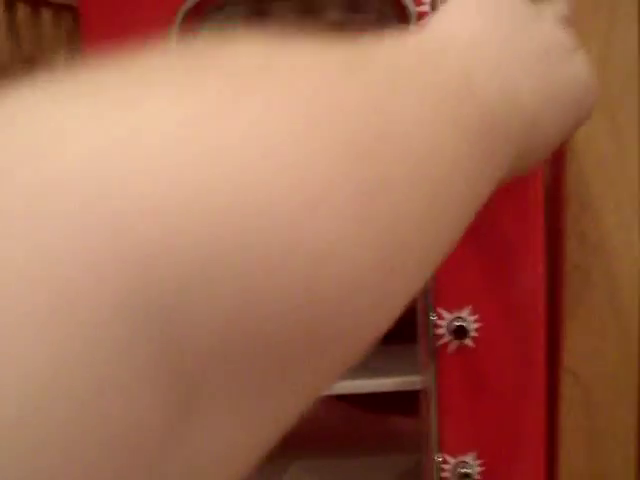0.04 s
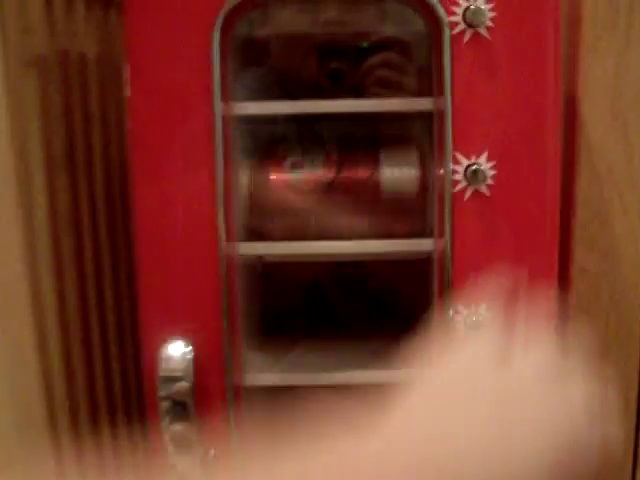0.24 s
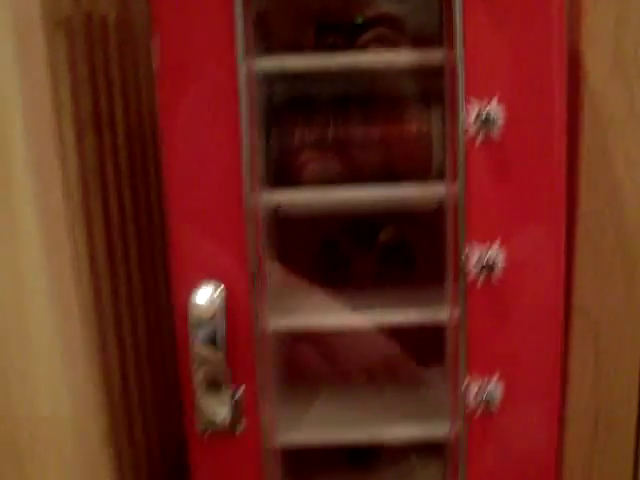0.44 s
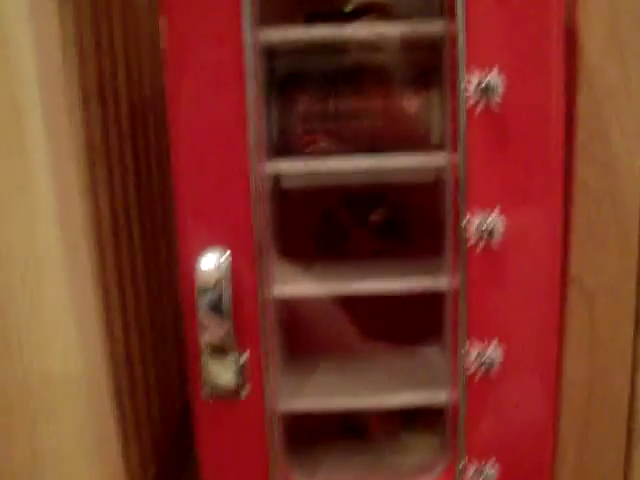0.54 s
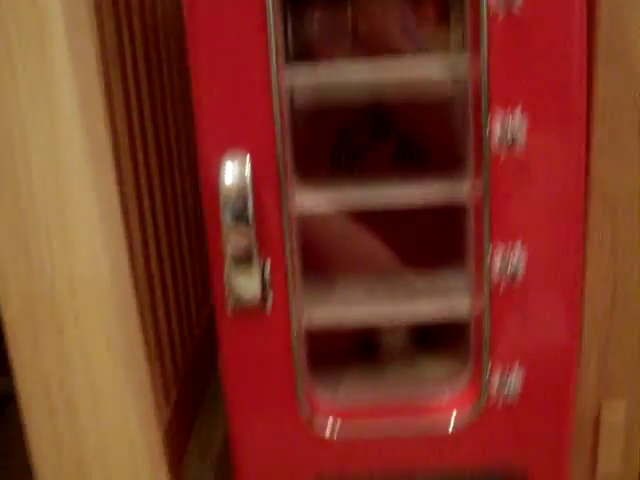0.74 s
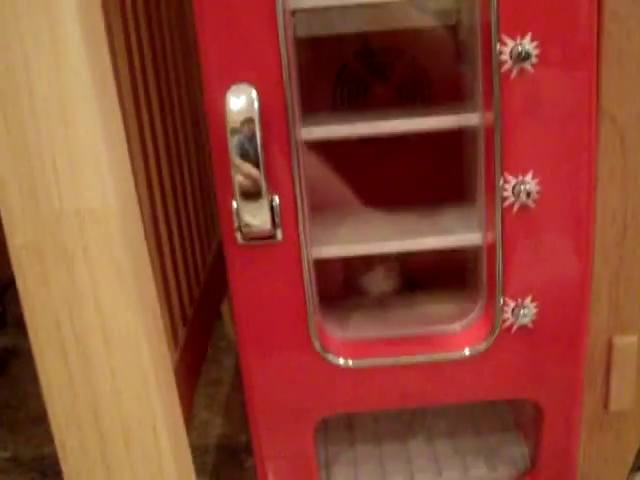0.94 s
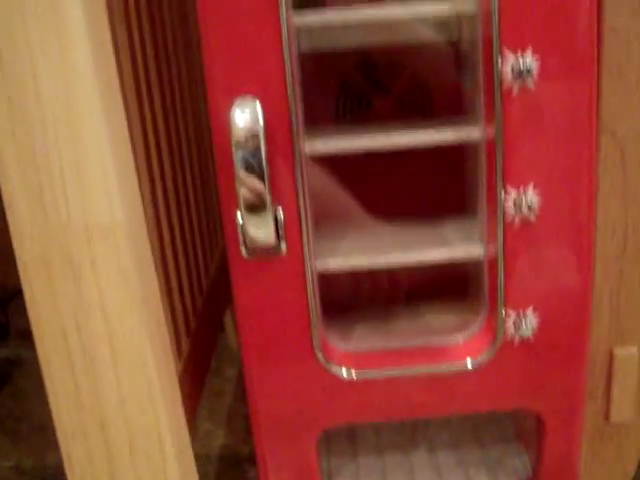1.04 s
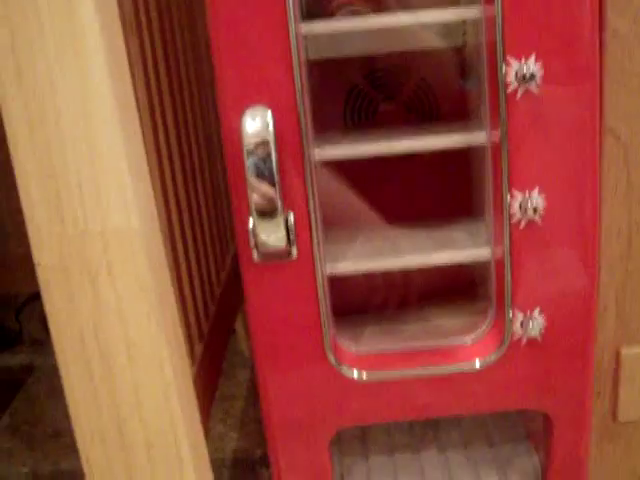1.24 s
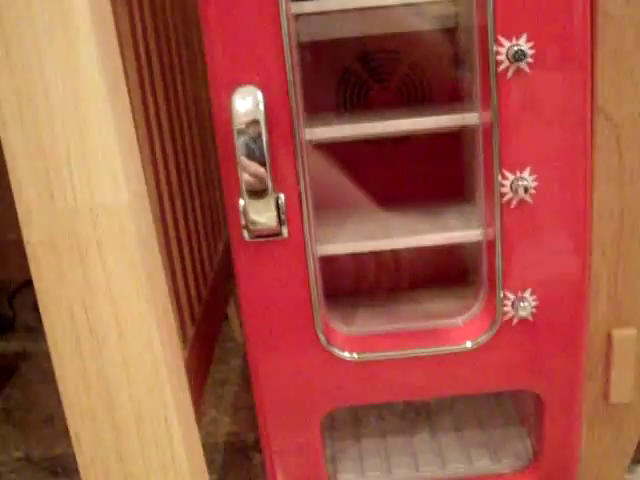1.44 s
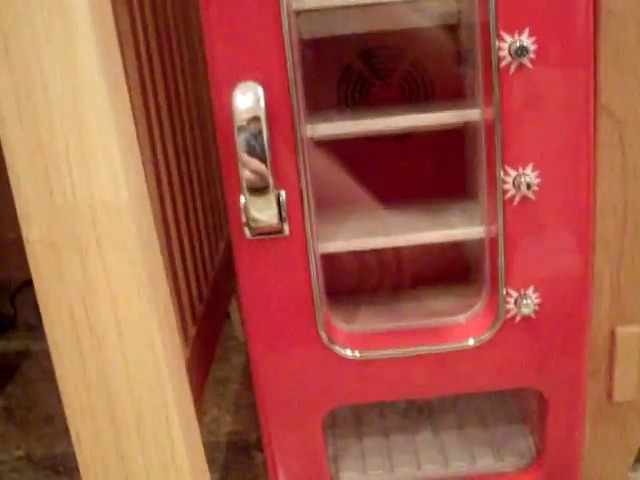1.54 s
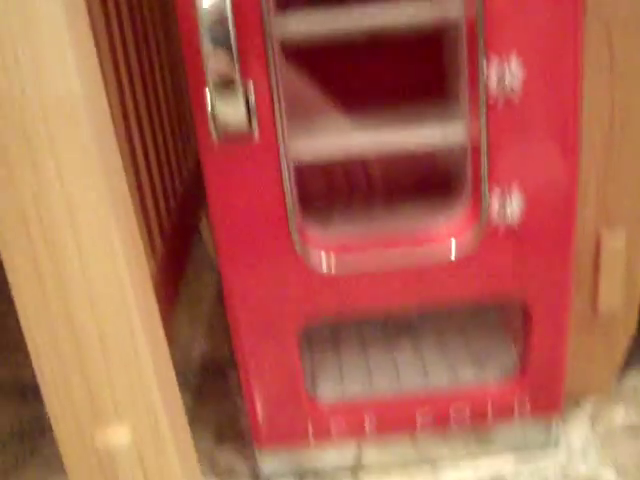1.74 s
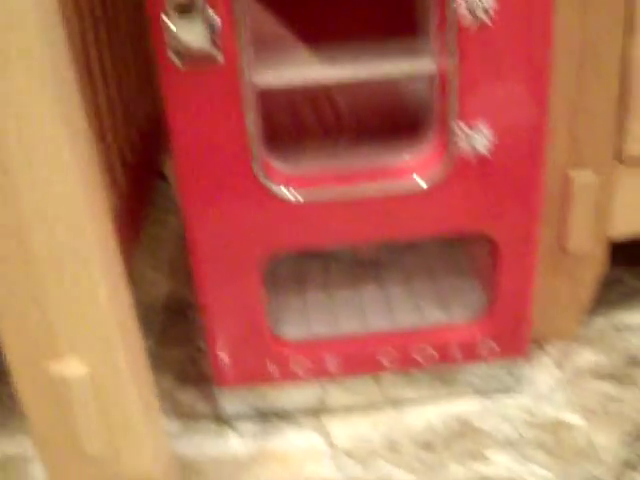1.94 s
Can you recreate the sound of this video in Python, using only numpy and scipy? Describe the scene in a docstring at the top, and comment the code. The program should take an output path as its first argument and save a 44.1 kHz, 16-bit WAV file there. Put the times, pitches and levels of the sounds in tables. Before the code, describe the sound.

Close and slightly overloaded, a release latch clicks and a full can bangs down a chute in a rapid cluster, pauses, then thunks again into the tray; boxy cabinet ring, quiet cooling fan, small room indoors.

```python
"""A can released inside a small vending fridge tumbles down the chute and thunks twice into the plastic tray.
Each blow excites decaying cabinet modes, a hollow panel note, a noisy knock and a clatter with metallic modes.
A latch clicks as snaps of noise over ringing metal; shaped noise makes a low rumble as the can rolls. The
cooling fan hums in wavering sines over rushing air. The microphone is close, in a small room; its input clips
on the big blows, and a notched voice band saturates softly after it."""
import sys
import numpy as np
from scipy import signal
from scipy.fft import rfft, irfft
from scipy.io import wavfile

SR = 44100
rng = np.random.default_rng(int(sys.argv[2]) if len(sys.argv) > 2 else 0)


def to_wav(s):
    """Save 16-bit WAV."""
    ch = np.atleast_2d(s).T  # columns
    pcm = np.round(np.clip(ch, -1, 1) * 32767)  # PCM
    wavfile.write(sys.argv[1], SR, pcm.astype(np.int16))


N = 85995
T = np.arange(27000) / SR  # time within one blow or click, s

# Blows of the can on chute and tray. Each row: start in seconds, cabinet boom in dB, panel knock in dB,
# bright clatter in dB, note of the struck panel in Hz, level of that note in dB.
BLOWS = [(0.125, -40, -28, -58.5, 138.4, -20), (0.275, -11.5, -13, -18.5, 184.4, 0),
         (0.3594, -3.5, 0, -11.5, 132, 7), (.366, -11.5, -1.5, -6.5, 288.8, 6.5),
         (.383, -6.5, -5.5, -7, 232, -3.5), (.427, -7, 2.5, 5, 215, 1), (.434, 2, -0.5, 2.5, 147.6, 8.5),
         (.446, -3, -2.5, -3, 120.3, 3), (.455, -7.5, -4, -0.5, 117, 3),
         (.472, -10.5, -5.5, -4.5, 116.7, 0.5), (0.505, -20, -11, -13, 284, -10.5),
         (.548, -7.5, -4.5, -7.5, 413.5, 0.5), (.556, -16.5, -10, -10, 277.5, -0.5),
         (.598, -26, -27, -17, 157, -20), (.625, -16.5, -11, -13, 422.5, -14),
         (.630, -22, -13.5, -13.5, 159, -9.5), (.672, -20.5, -17, -23.5, 177.6, -6.5),
         (0.727, -46.5, -35, -37, 161.6, -15.5), (0.826, -37.5, -41, -36.5, 189.5, -45),
         (1.036, -29, -30.5, -41, 173, -21), (1.091, -19, -17.5, -26, 174, -26.5),
         (1.134, -15, -18, -38, 173, -15), (1.160, -7, 2, 3, 454.5, 3.5),
         (1.170, -5.5, -3.5, -5.5, 154.9, 8.5), (1.209, -15, -20, -27, 608, -10.5),
         (1.222, -14, -13, -12.5, 227.2, -4.5), (1.243, -18.5, -24, -29, 173, -6.5),
         (1.256, -24, -23, -37.5, 232, -7), (1.328, -30, -23, -33, 227, -29),
         (1.365, -28.5, -30, -37, 114, -18)]
# Modes of the hollow cabinet. Each row: frequency in Hz, relative level in dB, t60 in seconds.
CABINET_MODES = [(75.4, -12, 0.53), (114.27, -8, 0.41), (162.55, -10, 0.52), (176.5, -5, 0.36),
                 (232.4, -9, 0.28), (279.3, -9, .28), (313.5, -15.5, 0.44), (387, -23.5, 0.21),
                 (463, -17.5, 0.5), (515.4, -23.5, 0.21), (739.5, -21, 0.21), (843, -17.5, .3)]
# Modes of the full can and the chute. Each row: frequency in Hz, relative level in dB, t60 in seconds.
CAN_MODES = [(992, -20.5, 0.18), (1191, -15, .28), (1326, -16, 0.2), (1930, -19.5, 0.18),
             (2195, -23.5, 0.15), (2395, -20, 0.19), (2830, -23, 0.15), (4210, -27, 0.13)]
# Spectrum of the panel knock. Each row: frequency in Hz, relative level in dB.
KNOCK_COLOUR = [(25, -25), (60, -20), (130, 2), (280, 2.5), (500, -0.5), (800, -6.5), (1400, -13.5),
                (3000, -26.5), (6000, -49)]
# Spectrum of the bright clatter. Each row: frequency in Hz, relative level in dB.
CLATTER_COLOUR = [(100, -27.5), (500, 13.5), (1000, 4.5), (2000, 7), (2800, 2.5), (4200, 0.5), (5500, -0.5)]
# Ring of the cabinet and room. Each row: frequency in Hz, t60 in seconds.
ROOM_DECAY = [(60, 0.39), (250, 0.36), (800, 0.47), (2000, 0.4), (5000, 0.33)]
# Clicks of the release latch. Each row: start in seconds, level in dB.
LATCH_CLICKS = [(.002, -28.5), (.166, -28), (.176, -26.5), (.183, -18.5), (.194, -4), (.200, -8),
                (0.22, -22.5), (0.235, -29.5)]
# Modes of the metal latch. Each row: frequency in Hz, relative level in dB, t60 in seconds.
LATCH_MODES = [(744, -8.5, .3), (1280, -14, 0.18), (1480, -30, 0.46), (1700, -30, 0.053),
               (2240, -12.5, 0.4), (3960, -30.5, 0.21), (5220, -29, 0.13)]
# Spectrum of the latch noise. Each row: frequency in Hz, relative level in dB.
CLICK_COLOUR = [(30, -29), (120, 5), (400, 8), (800, 9), (1500, 9.5), (2700, 4), (4300, 3), (5500, -6)]
# Low rumble as the can rolls. Each row: time in seconds, level in dB.
ROLL_LEVEL = [(0, -39.5), (.17, -38), (.23, -22), (.3, -50.5), (.5, -9), (.7, -32), (.8, -34.5),
              (1.0, -42.5), (1.15, -39), (1.4, -40.5), (1.55, -49), (1.95, -58)]
# Spectrum of that rumble. Each row: frequency in Hz, relative level in dB.
ROLL_COLOUR = [(20, -8), (45, -7), (66, -3.5), (76, 4), (95, -14), (120, -2.5), (180, -6.5), (300, -18),
               (900, -22), (5000, -43)]
# Tones of the fan. Each row: frequency in Hz, rms level in dB before flutter.
FAN_TONES = [(177.6, -55.5), (295, -44.5), (587, -58), (1007, -66), (1260, -60.5), (1351, -59.5),
             (1793, -60.5)]
# Spectrum of the fan's air. Each row: frequency in Hz, relative level in dB.
AIR_COLOUR = [(20, -4.5), (43, 6), (65, -8.5), (120, -9.5), (180, -6.5), (300, 0.5), (420, -5), (800, -7.5),
              (1400, -10), (2100, -9), (2800, -18), (4300, -19), (5500, -21.5)]

BOOM_RISE_S, BOOM_SCATTER_DB = 0.0053, 0.5
NOTE_RISE_S, NOTE_T60_S = 0.0044, 0.099
GRAIN_DB, GRAIN_HZ = 2.5, 260  # rms depth and rate of the chatter in a burst
SNAP_DB, SNAP_T60_S = -2.5, 0.0082
PITCH_WANDER, LEVEL_FLUTTER = 0.0074, 0.15  # rms fractions, fan tones
AIR_DB = -42
OVERLOAD, KNEE = 1.15, 0.83  # amplitudes: input clips; later saturation begins
NOTCH_HZ, NOTCH_WIDTH_HZ, NOTCH_DB = 3395, 236, -46
VOICE_EDGE_HZ, EDGE_HZ = 5350, 16500


def amp(db):
    """Level to amplitude: 20 dB is a factor of ten."""
    return 10 ** (np.asarray(db) / 20)


def unit(x):
    """Normalisation to an rms of one."""
    return x / np.sqrt(np.mean(x ** 2) + 1e-20)


def read(points, hz):
    """Interpolation of a table along a logarithmic frequency axis."""
    f, value = np.transpose(points)
    return np.interp(np.log(hz + 1), np.log(f), value)


def add(mix, s, sound):
    """Superposition: a sound is summed into the mix from a time in seconds."""
    part = mix[max(round(s * SR), 0):][:len(sound)]
    part += sound[:len(part)]


def filtered_noise(gain, size):
    """Spectral shaping: white noise weighted by a gain on each frequency."""
    return unit(irfft(rfft(rng.standard_normal(size)) * gain, size))


def noise(colour, size):
    """Coloured noise: its spectrum follows a table of levels."""
    return filtered_noise(amp(read(colour, np.fft.rfftfreq(size, 1 / SR))), size)


def drift(rate_hz, size=N):
    """Slow random modulation: noise under a Gaussian low-pass."""
    return filtered_noise(np.exp(-(np.fft.rfftfreq(size, 1 / SR) / rate_hz) ** 2), size)


def ring(modes, scatter_db):
    """Modal decay: a strike shares its force among the modes a little differently each time."""
    out = np.zeros(len(T))
    for hz, db, t60 in modes:
        level = db + scatter_db * rng.standard_normal()
        out += amp(level - 60 * T / t60) * np.sin(2 * np.pi * hz * T)
    return out


def burst(colour, t60, room_db):
    """High modal density: crowded panel modes chatter and die fast, then ring on in cabinet and room."""
    hz, t, bands = signal.stft(noise(colour, len(T)), SR, nperseg=512)
    decay = amp(-60 * t / read(ROOM_DECAY, hz)[:, None])  # each frequency has its own t60
    tail = signal.istft(bands * decay, SR, nperseg=512)[1][:len(T)]
    chatter = unit(amp(GRAIN_DB * drift(GRAIN_HZ, size=len(T))))
    direct = noise(colour, len(T)) * chatter * amp(-60 * T / t60)
    # onsets: 1.2 ms direct, 13 ms for the ring
    return direct * np.minimum(T / 0.0012, 1) + amp(room_db) * tail * np.minimum(T / 0.013, 1)


def can():
    """Impact excitation: every blow sets off cabinet boom, hollow panel note, knock and metallic clatter."""
    out = np.zeros(N)
    for s, boom_db, knock_db, clatter_db, note_hz, note_db in BLOWS:
        boom = ring(CABINET_MODES, BOOM_SCATTER_DB) * (1 - np.exp(-T / BOOM_RISE_S))
        note_envelope = (1 - np.exp(-T / NOTE_RISE_S)) * amp(-60 * T / NOTE_T60_S)
        note = np.sin(2 * np.pi * note_hz * T) * note_envelope
        knock = burst(KNOCK_COLOUR, t60=0.092, room_db=-12)
        clatter = burst(CLATTER_COLOUR, t60=0.044, room_db=-15.5)
        clatter += amp(-5.5) * ring(CAN_MODES, scatter_db=2.5)
        add(out, s, amp(boom_db) * boom + amp(note_db) * note)
        add(out, s, amp(knock_db) * knock + amp(clatter_db) * clatter)
    return out


def latch():
    """Impulsive release: the latch catches, snaps over and rattles, each click ringing its metal modes."""
    out = np.zeros(N)
    for s, db in LATCH_CLICKS:
        snap = amp(SNAP_DB - 60 * T / SNAP_T60_S) * noise(CLICK_COLOUR, len(T))
        rattle = burst(CLICK_COLOUR, t60=0.047, room_db=-15)
        metal = amp(-5.5) * ring(LATCH_MODES, scatter_db=3.0)
        add(out, s, amp(db) * (snap + rattle + metal))
    return out


def roll():
    """Amplitude-modulated noise: a low rumble as the can rolls, swelling and fading."""
    level_db = np.interp(np.arange(N) / SR, *np.transpose(ROLL_LEVEL))
    return noise(ROLL_COLOUR, N) * amp(level_db)


def fan():
    """Rotating blades: tones share one wandering speed and flutter apart, over broadband air noise."""
    warped_s = np.cumsum(1 + PITCH_WANDER * drift(rate_hz=9)) / SR
    out = amp(AIR_DB) * noise(AIR_COLOUR, N)
    for hz, db in FAN_TONES:
        flutter = 1 + LEVEL_FLUTTER * drift(rate_hz=19)
        tone = np.sin(2 * np.pi * (hz * warped_s + rng.random()))
        out += amp(db) * np.sqrt(2) * flutter * tone
    return out


def scene():
    """Superposition of all sources at the microphone."""
    return (can() + latch() + roll() + fan())[None]


def low_pass(x, hz):
    """Band limiting by a steep linear-phase filter."""
    taps = signal.firwin(401, hz, window=("kaiser", 8), fs=SR)
    return signal.oaconvolve(x, taps[None], "same")


def record(dry):
    """Nonlinear distortion: the input clips, a notched voice band follows, and its peaks saturate softly."""
    hz = np.fft.rfftfreq(N, 1 / SR)
    notch = amp(NOTCH_DB * np.exp(-((hz - NOTCH_HZ) / NOTCH_WIDTH_HZ) ** 2))
    clipped = np.clip(dry, -OVERLOAD, OVERLOAD)
    voiced = low_pass(irfft(rfft(clipped) * notch, N), VOICE_EDGE_HZ)
    below_knee = np.clip(voiced, -KNEE, KNEE)
    headroom = 1 - KNEE
    saturated = below_knee + headroom * np.tanh((voiced - below_knee) / headroom)
    return low_pass(saturated, EDGE_HZ)


dry = scene()
out = record(dry)
to_wav(out)
```